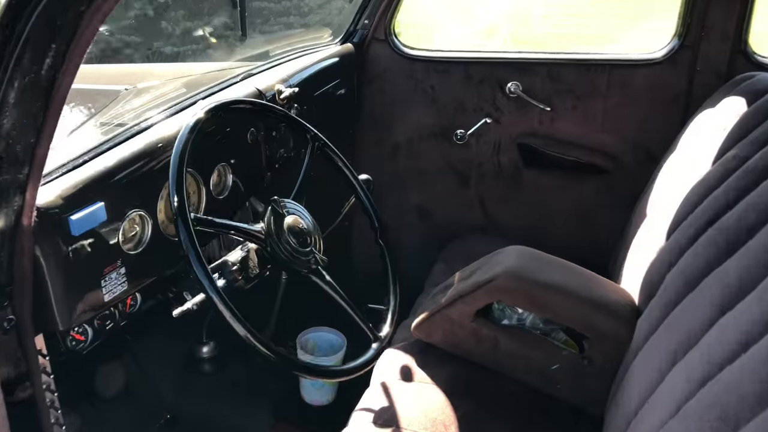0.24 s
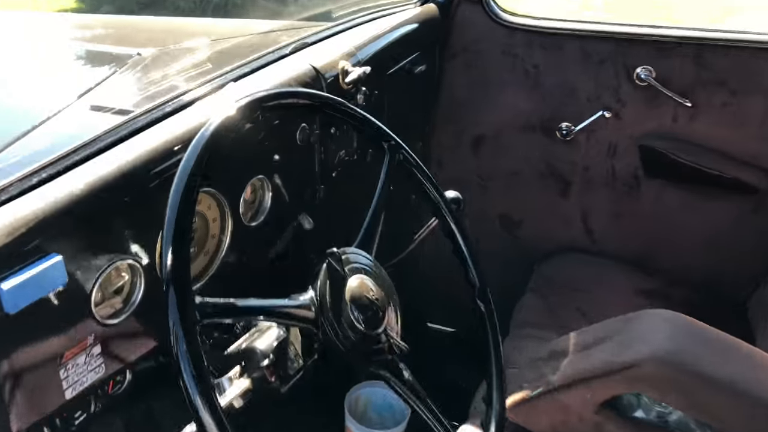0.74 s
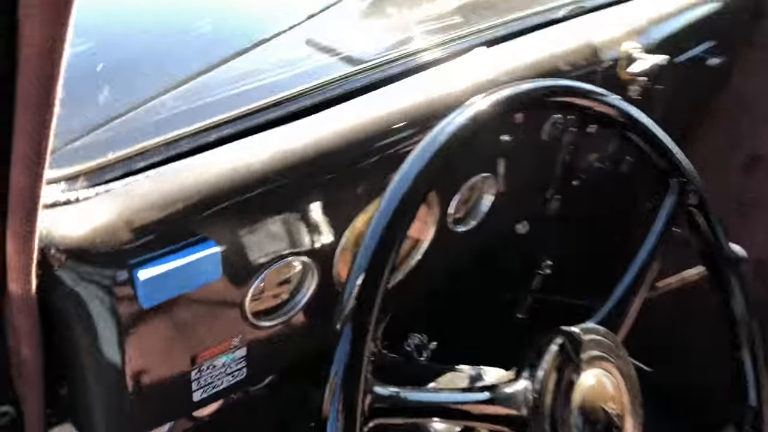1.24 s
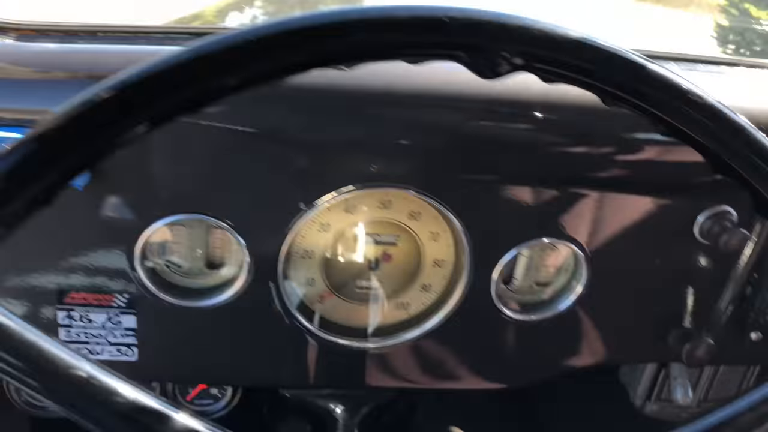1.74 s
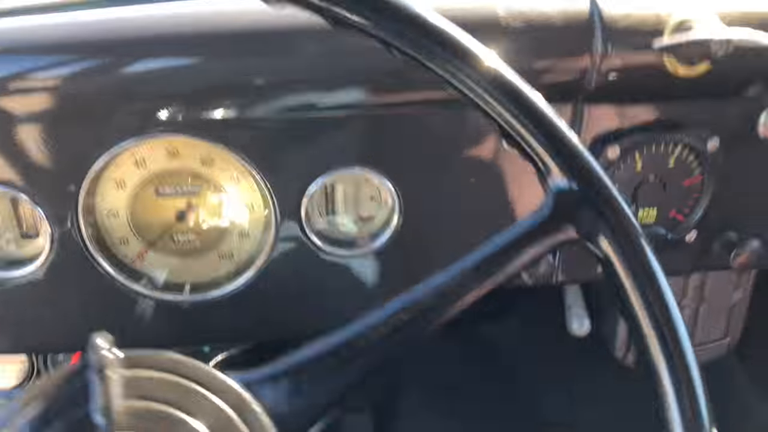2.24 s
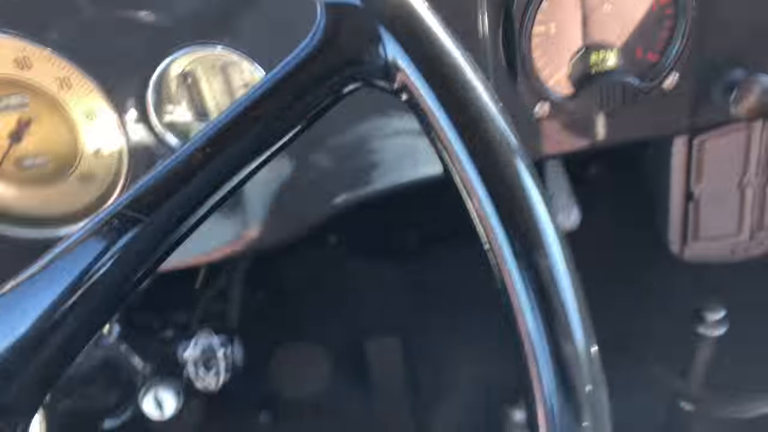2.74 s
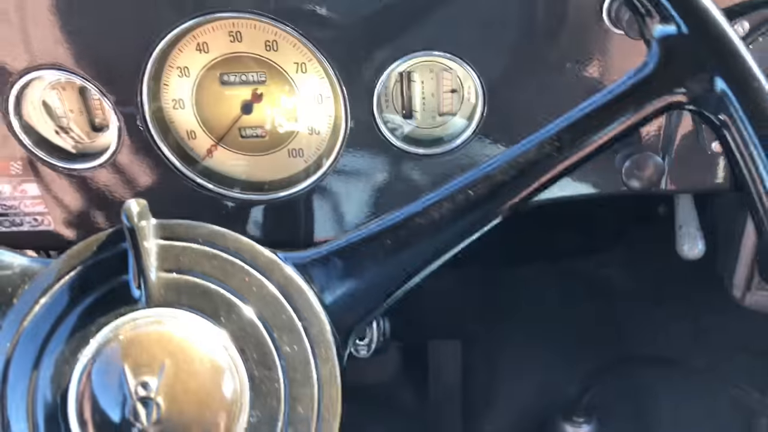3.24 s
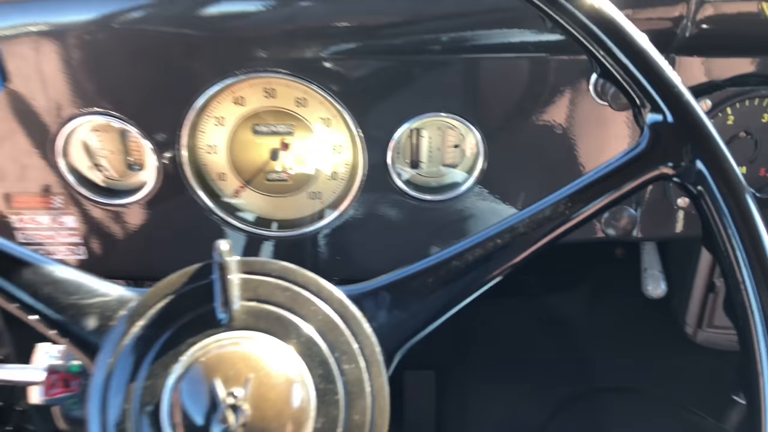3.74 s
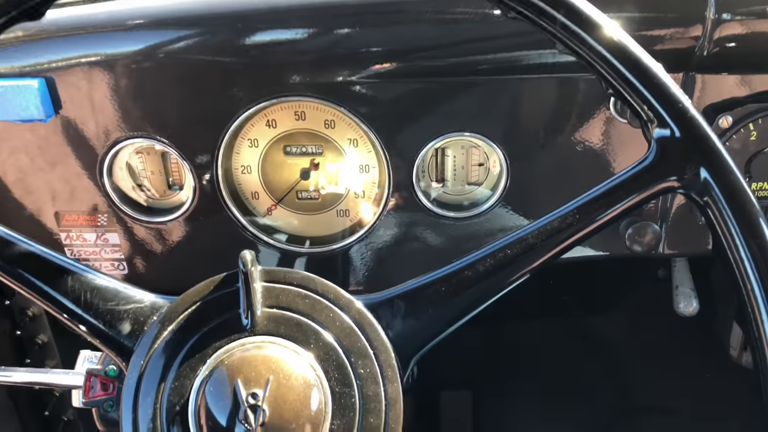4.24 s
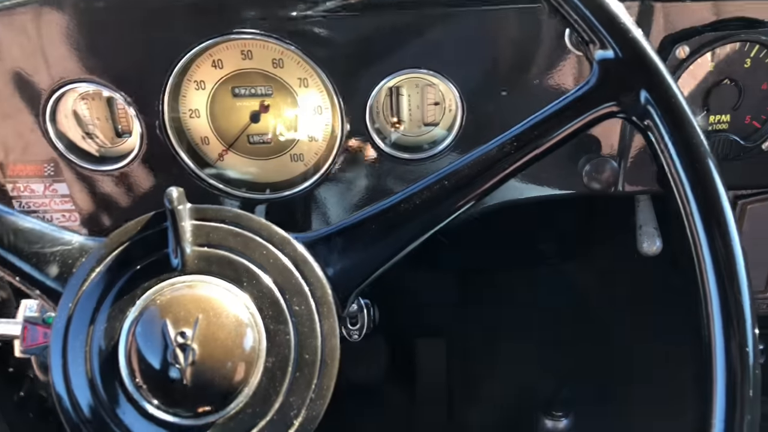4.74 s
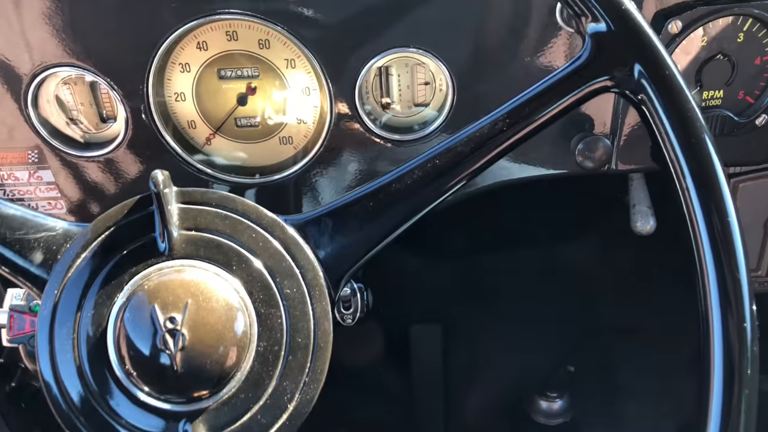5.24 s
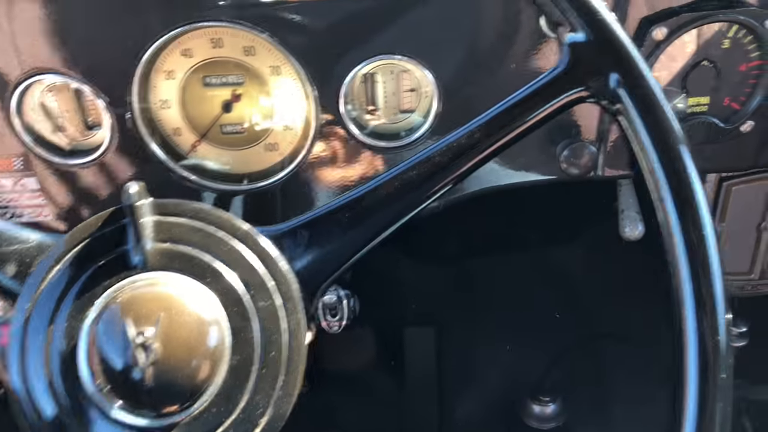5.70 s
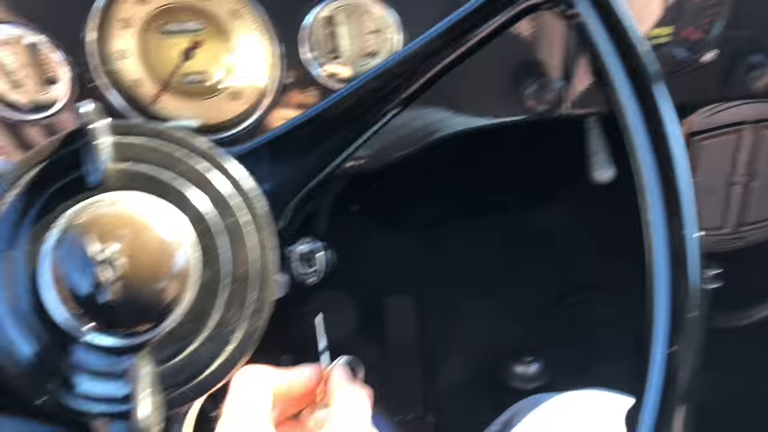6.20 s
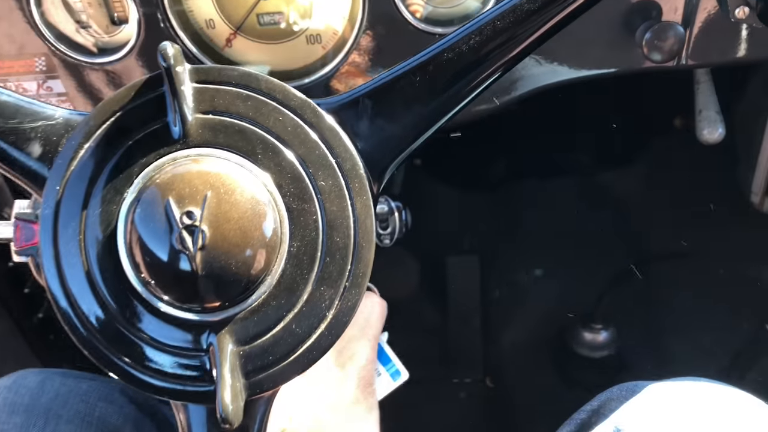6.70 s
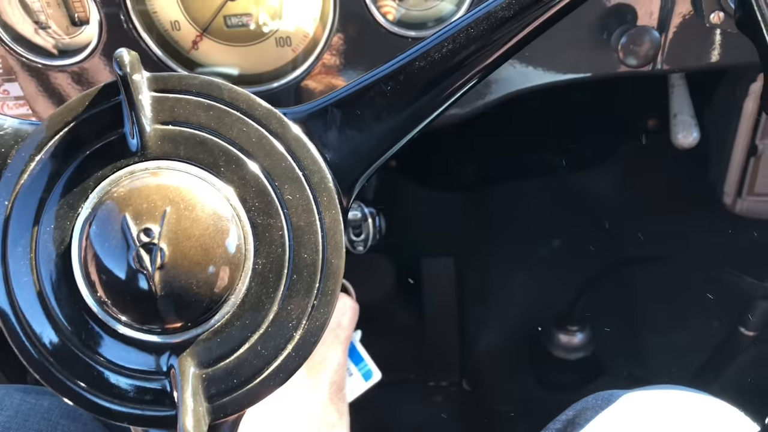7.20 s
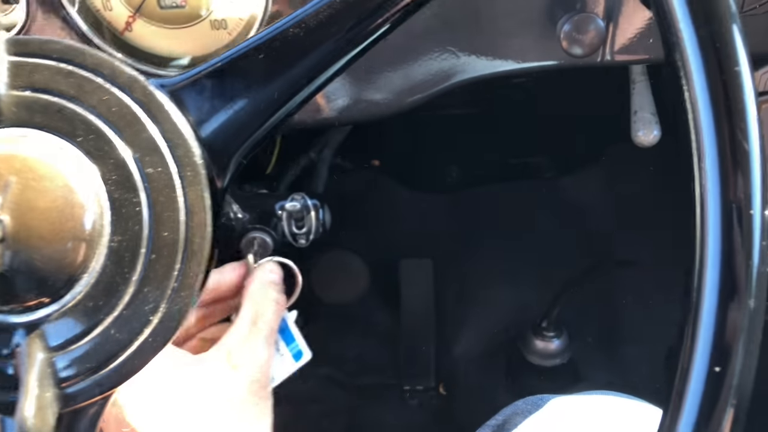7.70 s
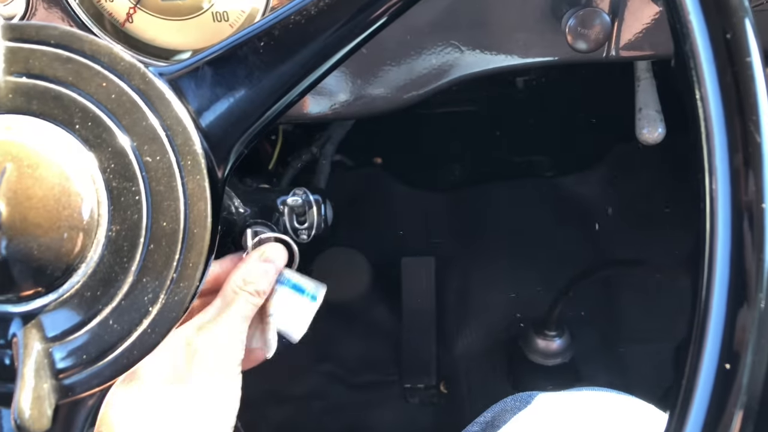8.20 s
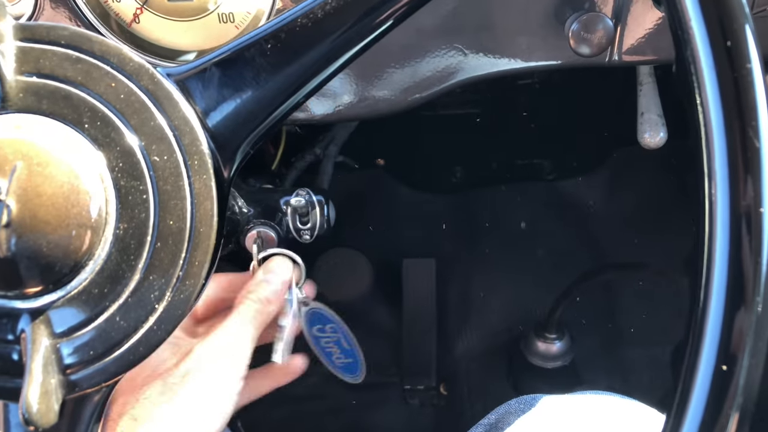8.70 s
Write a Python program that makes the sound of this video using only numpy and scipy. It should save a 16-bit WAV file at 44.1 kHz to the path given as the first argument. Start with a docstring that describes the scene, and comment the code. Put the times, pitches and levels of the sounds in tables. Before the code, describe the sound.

Close, dry handheld pickup in a padded vintage car cabin. Low traffic drone and some tyre hiss enter through the open door as springs thump, upholstery knocks and clothes drag. The door shuts in a heavy, shuddering slam with loose trim rattling. Afterwards the outside is muffled, and thin metal keys jingle, pause, tick faintly around the lock, and finally jingle hard with a piercing ping.

```python
"""Inside an old parked car: the driver slides onto the seat, pulls the heavy door shut and handles a bunch of keys.
Traffic, cloth and grit are coloured noise under moving levels. Seat, door, keys, badge and lock are damped tones
with bursts of noise, laid at listed times. Far traffic drones through the body; near the end one key swings free
and sings in steady tones that swell and fade."""
import sys
import numpy as np
from scipy import signal
from scipy.fft import rfft, irfft, next_fast_len
from scipy.io import wavfile
from scipy.ndimage import map_coordinates

SR = 44100
rng = np.random.default_rng(int(sys.argv[2]) if len(sys.argv) > 2 else 0)


def store_pcm(level_fs):
    """Save levels as 16-bit WAV."""
    pcm = np.round(np.clip(level_fs, -1, 1) * 32767).astype(np.int16)
    wavfile.write(sys.argv[1], SR, np.atleast_2d(pcm).T)


N = 394694
SETTLED_S = 3.4  # the shut door has settled; until then more comes in from outside


def amp(db):
    """Decibels to gain."""
    return 10 ** (np.asarray(db) / 20)


def unit(x):
    """Scaled to rms 1."""
    return x / np.sqrt(np.mean(x ** 2) + 1e-20)


def curves(rows):
    """One value per sample for each column after the time."""
    s, *cols = np.transpose(rows)
    return [np.interp(np.arange(N) / SR, s, c) for c in cols]


def wobble(rate):
    """A smooth random curve, rate knots a second."""
    coarse = np.arange(0, N + 32, 32)
    knots = rng.standard_normal(int(N * rate / SR) + 4)
    return np.interp(np.arange(N), coarse, map_coordinates(knots, [coarse * rate / SR]))


def noise(spectrum, spikes_db=0):
    """Noise of rms 1 coloured by rows of f/Hz, level/dB; spikes make it grainy."""
    f, db = np.transpose(spectrum)
    m = next_fast_len(N)
    white = rng.standard_normal(m) * amp(spikes_db * rng.standard_normal(m))
    hz = np.fft.rfftfreq(m, 1 / SR)
    colour = amp(np.interp(np.log(hz + 1), np.log(f + 1), db))
    return unit(irfft(rfft(white) * colour, m)[:N])


def modes(table, t, rise_s):
    """One damped tone for each row of f/Hz, level/dB, t60/s, with a soft onset."""
    hz, db, t60 = np.transpose(table)[..., None]
    return amp(db - 60 * t / t60) * np.sin(2 * np.pi * hz * t) * (1 - np.exp(-t / rise_s))


def ring(tones, spread_db):
    """The tones summed, struck at new random strengths."""
    return amp(spread_db * rng.standard_normal(len(tones))) @ tones


def add(track, s, sound):
    """Lays a sound into the track at time s."""
    part = track[round(s * SR):][:len(sound)]
    part += sound[:len(part)]


def strokes(table, sound):
    """The sound let through in swells of start/s, end/s, level/dB."""
    out = np.zeros(N)
    for start, end, db in table:
        t = np.arange(round((end - start) * SR)) / SR
        swell = np.sin(np.pi * t / (end - start)) ** 0.51
        add(out, start, amp(db) * swell * sound[round(start * SR):][:len(t)])
    return out


def traffic():
    """Rumble noise, a far engine as two gliding sines in blurred noise, and tyre noise fading away."""
    # low background before its random sway: t/s, rumble level/dB, drone level/dB
    lows = [(0, -51.5, -47), (.5, -43, -40), (1.5, -48.5, -50), (1.8, -39.5, -47), (2.45, -57, -48.5),
            (3.1, -39, -51), (3.7, -53.5, -55), (4.65, -60.5, -60), (5.0, -51, -57.5), (6.0, -54.5, -61.5),
            (7.0, -62.5, -60.5), (8.5, -57.5, -54), (8.65, -48.5, -52.5), (8.95, -56.5, -64.5)]
    # mean pitch of the drone: t/s, f/Hz
    drone_pitch = [(0, 111.3), (2.9, 108), (3.5, 130.5), (6.6, 131.2), (6.85, 110), (8.95, 115)]
    # colour of the rumble: f/Hz, level/dB
    rumble_colour = [(15, -42), (25, -18), (36, -6.5), (49, -3), (65, -0.5), (88, -8.5), (110, -42),
                     (190, -120)]
    # colour of the tyre roar: f/Hz, level/dB
    tyre_colour = [(210, -40.5), (350, -11), (578, 3), (817, -5), (987, -3.5), (1250, -9), (2500, -30),
                   (3250, -55.5), (5500, -120)]
    # tyres through the open door, before their sway: t/s, level/dB
    passing = [(0, -47), (.5, -57.5), (.9, -64), (1.5, -86), (2.7, -70), (3.0, -90)]

    rumble_db, drone_db = curves(lows)
    gusts_db = 2 * wobble(12) * (np.arange(N) < SETTLED_S * SR)
    rumble_db = rumble_db + gusts_db + 3.3 * wobble(4.5)
    drone_db = drone_db + gusts_db + 1.5 * wobble(4.4)

    phase = 2 * np.pi * np.cumsum(curves(drone_pitch)[0] + 3 * wobble(8.3)) / SR
    engine = np.sqrt(2) * (np.sin(phase) + amp(-16) * np.sin(0.6 * phase))
    blur = noise([(70, -37.5), (100, 8.0), (150, 2.5), (220, -11.5), (300, -46)])
    drone = amp(2.9 * wobble(16)) * engine + amp(-3.0) * blur

    tyres = amp(curves(passing)[0] + 1.2 * wobble(13)) * noise(tyre_colour)
    return tyres + amp(rumble_db) * noise(rumble_colour) + amp(drone_db) * drone


def cloth():
    """Trousers and sleeves drag over the seat: uneven grainy noise, with scuffs and weight shifts in swells."""
    # how much the driver moves: t/s, rustle level/dB before its sway
    movement = [(.3, -69.5), (.8, -70), (.9, -56.5), (1.1, -54), (1.6, -59), (2.0, -57), (2.59, -55.5),
                (2.74, -41), (3.0, -65), (3.7, -62), (4.13, -69.5), (4.45, -62), (5.07, -72), (5.45, -79),
                (5.92, -66.5), (6.7, -66), (7.2, -75.5), (7.9, -76), (8.14, -68), (8.7, -73.5)]
    # colour of the dull rub: f/Hz, level/dB
    rub_colour = [(88, -31), (150, -1), (339, -9), (409, -11), (611, -14.5), (996, -17.5), (2550, -32.5),
                  (3000, -34), (3900, -59), (6600, -120)]
    # colour of the bright rustle: f/Hz, level/dB
    rustle_colour = [(880, -30), (1500, -3.5), (2660, -5), (3300, -3.5), (7310, -8), (11300, -11.5),
                     (15300, -9.5)]
    # rougher drags across upholstery and door seal: start/s, end/s, level/dB
    scuffs = [(1.07, 1.21, -52.5), (1.27, 1.33, -75), (1.4, 1.44, -70), (1.51, 1.62, -51),
              (1.93, 2.05, -56), (2.27, 2.42, -52), (2.5, 2.66, -48), (2.66, 2.775, -48), (8.19, 8.35, -66),
              (8.45, 8.72, -63.5)]
    # colour of the scuffs: f/Hz, level/dB
    scuff_colour = [(300, -29), (700, -2), (1300, 2.5), (2200, -10.5), (3600, -8.5), (6000, -18.5),
                    (9000, -40)]
    # weight shifts on the cushion: start/s, end/s, level/dB
    shifts = [(3.0, 3.3, -58), (1.62, 1.82, -52), (4.35, 5.2, -62)]

    rustle_db, = curves(movement)
    drag, catch = wobble(11), wobble(40)
    # the rub swings less than the rustle, over a dull wash until the door settles
    rub_gain = amp(4 + rustle_db - 0.35 * (rustle_db - rustle_db.mean()))
    rub_gain += amp(-53.5) * (np.arange(N) < SETTLED_S * SR)
    rub = rub_gain * amp(1.8 * drag + 1.4 * catch) * noise(rub_colour, spikes_db=3)
    rustle_db = rustle_db + 2.1 * drag + 1.7 * catch + 1.1 * wobble(90)
    rustle = amp(rustle_db) * noise(rustle_colour, spikes_db=4)

    cushion = noise([(200, -26), (320, 6), (600, -7.5), (1200, -27.5)])
    cushion = unit(amp(6.6 * wobble(13)) * cushion)
    scuffing = unit(amp(4.5 * wobble(75)) * noise(scuff_colour, spikes_db=3.5))
    return rub + rustle + strokes(shifts, cushion) + strokes(scuffs, scuffing)


def seat():
    """Each knock is a low thump of the springs, a wooden puff and a thin snap."""
    # seat and floor knocks, levels before trim: t/s, puff level/dB, thump level/dB, snap over puff/dB
    knocks = [(0.491, -59, -48, -28), (0.589, -70, -31.5, -30), (1.113, -26.5, -55, -17),
              (1.167, -28, -21.5, -28), (1.257, -17, -39, -29), (1.529, -56, -30, -13),
              (1.796, -51, -29, -25.5), (1.84, -21.5, -43, -41), (2.145, -40.5, -56, 6),
              (2.221, -69.5, -36, -12), (2.264, -19, -60, -28.5), (2.591, -20.5, -19.5, -24),
              (2.691, -25.5, -39, -16), (3.208, -27.5, -49, -39), (5.074, -41.5, -48, -8),
              (5.933, -45.5, -50.5, -20.5), (8.64, -44, -46, -25)]
    # spring tones: f/Hz, level/dB, t60/s
    spring_tones = [(64.3, -2, .1), (190, 0, 0.082)]
    # colour of the puff: f/Hz, level/dB
    puff_colour = [(88, -40.5), (150, -5), (451, -2.5), (623, -16.5), (925, -12.5), (1440, -13),
                   (2370, -27), (5000, -37.5), (6500, -56), (11000, -120)]
    # colour of the snap: f/Hz, level/dB
    snap_colour = [(880, -34.5), (1500, -12.5), (1670, -5), (3060, -18), (4990, -7), (6190, -16.5),
                   (15500, -30)]

    out, t = np.zeros(N), np.arange(SR // 5) / SR
    puff, snap = noise(puff_colour), noise(snap_colour)
    springs = modes(spring_tones, t, rise_s=0.017)
    fall = amp(-60 * t / 0.074) + amp(2.0 - 60 * t / 0.0048)
    envelope = fall * (1 - np.exp(-t / 0.00081))
    for s, puff_db, thump_db, snap_db in knocks:
        at = slice(round(s * SR), round(s * SR) + len(t))
        add(out, s, amp(thump_db + 4.5) * ring(springs, spread_db=2.5))
        add(out, s, amp(puff_db - 8) * envelope * (puff[at] + amp(snap_db + 3.5) * snap[at]))
    return out


def door():
    """Meeting latch and frame, the door shudders: each jolt drives low modes anew and shakes trim and latch."""
    # jolts of the slam: t/s, boom level/dB, panel level/dB, trim level/dB
    slam = [(2.764, -33, -18, -8), (2.777, -24, -23, -11), (2.798, 1, -32, -10), (2.814, 2, -28, -21.5),
            (2.839, -40, -0.5, -24), (2.857, -0.5, -6.5, -26), (2.879, -5, -0.5, -25),
            (2.911, -14.5, -32, -30.5), (2.935, -21, -15, -58), (2.972, -50, -14.5, -56),
            (3.01, -19, -28, -53), (3.08, -27, -24.5, -55), (3.201, -23.5, -37, -40)]
    # panel tones: f/Hz, level/dB, t60/s
    panel_tones = [(129.7, 0, 0.092), (167, -7.5, .2)]
    # sheet-metal skin tones: f/Hz, level/dB, t60/s
    skin_tones = [(192, 1.5, 0.083), (269.5, 1.5, 0.21), (351, -11.5, 0.21), (420, -13, 0.091)]
    # colour of the loose trim's rattle: f/Hz, level/dB
    rattle_colour = [(240, -31.5), (400, 0.5), (680, -15), (949, -11), (1100, -7.5), (1210, -16.5),
                     (1520, -12.5), (1910, -20), (3240, -22.5), (4330, -28.5), (6710, -37.5),
                     (11100, -43.5), (15000, -42)]
    # colour of the crack: f/Hz, level/dB
    crack_colour = [(350, -29.5), (600, -4), (855, -0.5), (1600, -9.5), (1760, -5.5), (2750, -9),
                    (3470, -13), (6950, -13.5), (15500, -20.5)]

    out, t = np.zeros(N), np.arange(SR // 4) / SR
    rattle = amp(1.8 * wobble(130)) * noise(rattle_colour, spikes_db=2.5)
    crack = noise(crack_colour, spikes_db=3.5)
    panel, skin = modes(panel_tones, t, rise_s=0.0033), modes(skin_tones, t, rise_s=0.0033)
    rattle_fall = (amp(-60 * t / 0.077) + amp(-31 - 60 * t / .5)) * (1 - np.exp(-t / 0.0076))
    crack_fall = amp(-60 * t / 0.065) + amp(-16.5 - 60 * t / 0.11)
    for s, boom_db, panel_db, trim_db in slam:
        at, since = slice(round(s * SR), round(s * SR) + len(t)), s - slam[0][0]
        # door mass on the cabin air: each jolt booms lower as the door settles
        boom_hz = 47 + (90 - 47) * np.exp(-since / 0.13)
        add(out, s, modes([(boom_hz, boom_db, .17)], t, rise_s=0.0025)[0])
        # the skin holds for 0.1 s, then sinks by 261 dB/s, but stays above the trim
        skin_db = max(-15.5 - 261 * max(since - .1, 0), trim_db + 2)
        if since < .06:
            skin_db -= 5  # a weak answer until the frame has taken the blow
        add(out, s, amp(panel_db) * ring(panel, spread_db=3.0))
        add(out, s, amp(skin_db) * ring(skin, spread_db=2.0))
        add(out, s, amp(trim_db) * rattle_fall * rattle[at])
        # the crack fades faster from jolt to jolt than the rattle
        add(out, s, amp(3.5 + 1.586 * trim_db) * crack_fall * crack[at])
    return out


def chatter():
    """Many tiny contacts of keys on the ring: a gritty slide with thin clicks and faint pings."""
    # keys sliding and chattering: start/s, end/s, level/dB before trim
    slides = [(3.657, 3.711, -51.5), (3.85, 3.916, -49.5), (4.045, 4.102, -47), (4.144, 4.177, -58.5),
              (4.298, 4.41, -56.5), (4.428, 4.566, -53.5), (4.761, 4.878, -56.5), (4.99, 5.094, -53),
              (5.355, 5.409, -46), (5.428, 5.506, -52), (8.051, 8.137, -60.5), (8.464, 8.499, -67),
              (8.495, 8.609, -50.5), (8.654, 8.686, -62.5), (8.779, 8.837, -54), (8.848, 8.934, -34.5)]
    # colour of the grit: f/Hz, level/dB
    grit_colour = [(350, -58), (600, -25.5), (3790, -5), (4900, -28), (6090, -4.5), (9920, -21),
                   (11500, -5), (15300, -7.5)]

    life = np.arange(SR // 60) / SR
    grit = noise(grit_colour)
    out = amp(-7.5) * strokes(slides, unit(amp(1.8 * wobble(180)) * grit))
    for start, end, db in slides:
        for when, pitch, size in rng.random((int(260 * (end - start)), 3)):  # 260 contacts a second
            ping_hz = 2300 * 6.5 ** pitch
            ping = modes([(ping_hz, db - 3 + 9 * size, .018)], life, rise_s=.0006)[0]
            grain = grit[int(pitch * (N - len(life))):][:len(life)]
            click = amp(db - 3.5 + 15.2 * size - 60 * life / 0.0048) * grain
            add(out, start + when * (end - start), ping + click)
    return out


def keys():
    """Each contact is a sharp tick with a short scatter and a ping, and sets keys, badge and lock ringing."""
    # keys jangling in the hand: t/s, strike level/dB, ping f/Hz, badge level/dB under the strike
    jangle = [(3.0185, -43, 14900, -20), (3.0494, -36.5, 6120, -28), (3.0829, -41, 15000, -50),
              (3.2311, -35, 5700, -22), (3.264, -34.5, 5330, -16), (3.3009, -38, 11600, -18),
              (3.3243, -27.5, 3630, -26), (3.3653, -38.5, 10560, -19), (3.6406, -37.5, 3840, -24),
              (3.6567, -33, 8100, -27.5), (3.687, -14, 9360, -41), (3.7933, -48, 8850, -21),
              (3.8495, -27.5, 8480, -11.5), (3.8861, -33, 3500, -15.5), (3.937, -19, 15000, -26),
              (3.9838, -40, 3600, -10.5), (4.0113, -44.5, 8200, -13), (4.045, -38.5, 5090, -8),
              (4.0577, -31, 5170, -19), (4.0713, -28, 15200, -21), (4.0906, -37, 4500, -22),
              (4.155, -44, 14100, -10), (4.1794, -39.5, 3600, -23), (4.212, -25.5, 7800, -26),
              (4.2433, -45.5, 4770, -12), (4.2842, -34, 15100, -31), (4.2964, -45, 5290, -25),
              (4.3183, -27.5, 12000, -27), (4.3314, -28, 8300, -29), (4.36, -23, 8100, -30),
              (4.3764, -36, 8060, -20), (4.3957, -37.5, 14100, -15), (4.4296, -23.5, 15050, -25.5),
              (4.4484, -32.5, 9030, -13), (4.4684, -40, 15000, -22), (4.5112, -14, 9000, -29.5),
              (4.5437, -40.5, 4690, -18), (4.7557, -38, 10400, -16.5), (4.784, -37.5, 10100, -31),
              (4.801, -36.5, 11200, -22), (4.817, -25, 13200, -21), (4.8304, -33, 8540, -24),
              (4.844, -33, 5500, -18), (4.8584, -37, 14000, -13), (4.9077, -42.5, 5700, -7.5),
              (4.993, -42.5, 6360, -9.5), (5.0169, -30.5, 7670, -10), (5.0454, -43.5, 12900, -18),
              (5.069, -41, 5460, -6.5), (5.083, -38, 6800, -11), (5.2643, -42, 5030, -12),
              (5.3238, -37.5, 13600, -13), (5.3642, -26.5, 14100, -15), (5.3756, -23, 8070, -17),
              (5.3856, -21.5, 11200, -17), (5.445, -40, 7130, -12), (5.4634, -33, 11500, -16),
              (5.4722, -25.5, 11600, -22), (5.4884, -37, 11600, -20), (5.5314, -52, 4870, -14),
              (5.5568, -45, 13500, -16)]
    # keys tapping at the lock: t/s, strike level/dB, lock level/dB under the strike
    taps = [(0.113, -46.5, -5.5), (0.308, -52, -3.5), (6.1404, -43.5, -13), (6.1659, -41, -14.5),
            (6.249, -24, -32), (6.3882, -41, -31), (6.4911, -48, -18), (6.542, -42, -22),
            (6.7392, -33, -14), (6.832, -54, -2.5), (6.8933, -39.5, -18), (7.0618, -40.5, -27.5),
            (7.075, -41, -17.5), (7.3372, -46, -23.5), (7.4584, -56, -10.5), (7.883, -30.5, -34.5),
            (7.9595, -28.5, -8.5), (8.0549, -16.5, -25), (8.0632, -11.5, -28.5), (8.0716, -20, -33.5),
            (8.1249, -49, -8), (8.1648, -30.5, -20), (8.3007, -46.5, -18), (8.3237, -51, -16),
            (8.3551, -29, -40.5), (8.502, -30.5, -12.5), (8.537, -26.5, -35), (8.547, -37, -30),
            (8.5848, -29.5, -24), (8.611, -11, -30), (8.6692, -49.5, -4.5), (8.754, -49.5, -20),
            (8.7974, -36, -24), (8.8079, -9, -29.5), (8.8346, -29, -24), (8.8487, -5.5, -58),
            (8.9086, -10.5, -32.5), (8.9112, -12.5, -31.5)]
    # tones of the long key: f/Hz, level/dB, t60/s
    long_tones = [(9040, 0, .06), (12340, -5, .04), (14100, -14, .05), (15040, 3, .045)]
    # tones of the short key: f/Hz, level/dB, t60/s
    short_tones = [(6245, -8, .07), (7760, -16, .05), (10372, 0, .11), (11620, -7, .07)]
    # tones of the badge on the ring: f/Hz, level/dB, t60/s
    badge_tones = [(2380, -4, 0.038), (2715, -4, 0.036), (3100, -7.5, 0.025)]
    # tones of the lock: f/Hz, level/dB, t60/s
    lock_tones = [(974, -7, 0.054), (1110, -19, 0.055), (1222, -0.5, 0.067)]
    # contacts that leave the long key ringing, before its flutter: t/s, level/dB
    long_rings = [(3.083, -49), (3.687, -23.5), (3.9364, -27.5), (4.2115, -43.5), (4.4305, -33),
                  (4.5113, -25.5), (4.817, -47.5)]
    # contacts that leave the short key ringing, before its flutter: t/s, level/dB
    short_rings = [(3.05, -60), (3.85, -62), (4.0577, -55), (4.092, -59), (4.317, -50), (6.177, -59),
                   (6.4915, -61), (7.9586, -57), (8.055, -41), (8.1646, -48), (8.536, -47)]

    out, t = np.zeros(N), np.arange(SR // 9) / SR
    bright = noise([(1200, -24), (2500, -23.5), (6000, -3.5), (9000, -2.5), (15500, 1.5), (17000, 4.5)],
                   spikes_db=8.5)
    cabin = noise([(900, -18), (2000, -6.5), (6000, 4), (15500, -11.5)])
    barrel = noise([(400, -21), (750, -11.5), (1050, -0.5), (1500, -19.0), (2400, -15.5)])
    # lengthened so that the last contacts find a full burst
    bright, cabin, barrel = [np.pad(x, (0, len(t)), "reflect") for x in (bright, cabin, barrel)]
    tick_fall = amp(-60 * t / .008) + amp(-8 - 60 * t / .035)  # tick and scatter
    dull_fall = amp(-60 * t / 0.065)
    long, short = modes(long_tones, t, rise_s=0.0012), modes(short_tones, t, rise_s=0.00092)
    badge, lock = modes(badge_tones, t, rise_s=0.0003), modes(lock_tones, t, rise_s=0.0021)

    swing_db = 3 * wobble(120)  # a swinging key's ring flutters
    for tones, strikes in ((long, long_rings), (short, short_rings)):
        for s, db in strikes:
            flutter_db = swing_db[round(s * SR):][:len(t)]
            add(out, s, amp(db + flutter_db) * ring(tones, spread_db=3.5))

    quiet_db = -40.5  # how faintly a contact wakes the other parts
    contacts = [(s, db, hz, -5, badge_db, quiet_db) for s, db, hz, badge_db in jangle]
    # a key held at the lock pings less than a free one
    contacts += [(s, db, rng.uniform(3944, 15000), -20, quiet_db, lock_db) for s, db, lock_db in taps]
    for s, db, ping_hz, ping_db, badge_db, lock_db in contacts:
        at = slice(round(s * SR), round(s * SR) + len(t))
        tick = amp(-7.5) * tick_fall * bright[at]
        ping = modes([(ping_hz, ping_db, .018)], t, rise_s=0.0011)[0]
        answer = amp(-20) * dull_fall * cabin[at]  # the upholstered cabin answers duller
        keys_ring = amp(quiet_db) * (ring(long, spread_db=4) + ring(short, spread_db=4.5))
        badge_ring = amp(badge_db) * ring(badge, spread_db=5)
        lock_ring = amp(lock_db) * (0.55 * ring(lock, spread_db=1.0) + 1.69 * dull_fall * barrel[at])
        add(out, s, amp(db) * (tick + ping + answer + keys_ring + badge_ring + lock_ring))
    return out


def singing_key():
    """The short key, let go, swings past: its tones swell as its face turns to the microphone."""
    # swell of the top tone: t/s, level/dB
    swell = [(8.848, -70), (8.851, -18), (8.86, -13), (8.868, -3), (8.877, -6.5), (8.889, -11),
             (8.897, -27), (8.93, -83)]
    # top and middle tone: f/Hz, f/Hz
    main_hz = (11829, 7763)
    # side tones: f/Hz, level/dB relative to each other
    side_tones = [(5216, 0), (6261, -15.5), (10372, -1.5)]

    top_db, = curves(swell)
    t = np.arange(N) / SR
    since = np.clip(t - swell[0][0], 0, None)
    top, middle = np.sin(2 * np.pi * np.outer(main_hz, t))
    middle_gain = amp(-15 + 1.9 * top_db)  # beams narrower than the top tone
    side = amp(3.6 * wobble(90)) * sum(amp(db) * np.sin(2 * np.pi * hz * t) for hz, db in side_tones)
    # the side tones die away, following only 0.27 of the swell
    side_gain = amp(-17.5 + 0.27 * top_db - 60 * since / 0.21) * (1 - np.exp(-since / 0.0018))
    return (since > 0) * (amp(top_db) * top + middle_gain * middle + side_gain * side)


def scene():
    """All sources, heard at one point."""
    background = traffic() + cloth() + seat()
    return (background + door() + chatter() + keys() + singing_key())[None]


def record(dry):
    """Bass roll-off, microphone hiss, soft overload near full scale, and the band limit."""
    # colour of the microphone hiss: f/Hz, level/dB
    hiss_colour = [(88, -35.5), (150, -5.5), (268, -10), (313, -8.5), (528, -17), (873, -27), (980, -27),
                   (2170, -31.5), (15300, -41)]

    bass_cut = signal.butter(2, 32, "high", fs=SR, output="sos")
    x = signal.sosfilt(bass_cut, dry) + amp(-71.5) * noise(hiss_colour)
    x = x / (1 + np.abs(x / 1.1) ** 6) ** (1 / 6)
    m = next_fast_len(N + 4096)
    top_hz, edge_hz = 15850, 120  # band limit and the width of its slope
    slope = (1 - np.tanh((np.fft.rfftfreq(m, 1 / SR) - top_hz) / edge_hz)) / 2
    return irfft(rfft(x, m) * slope, m)[:, :N]


dry = scene()
out = record(dry)
store_pcm(out)
```